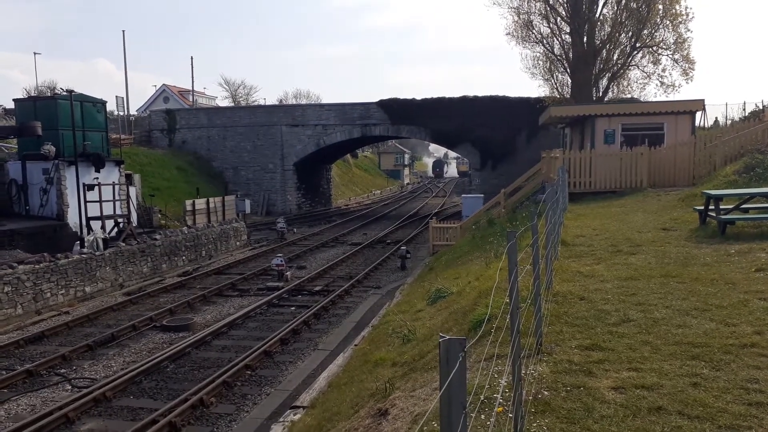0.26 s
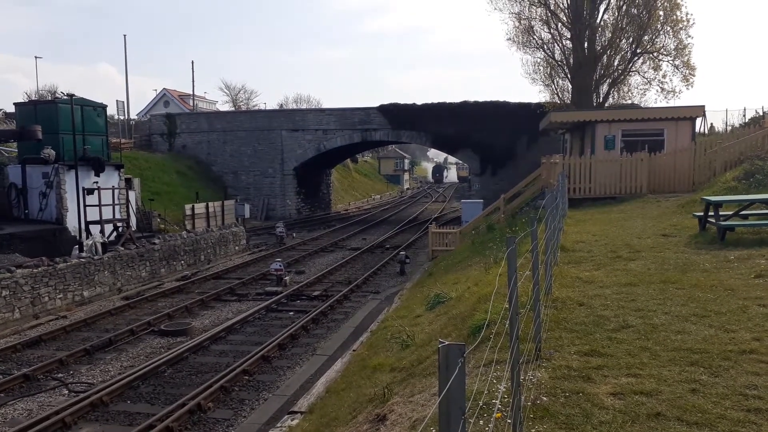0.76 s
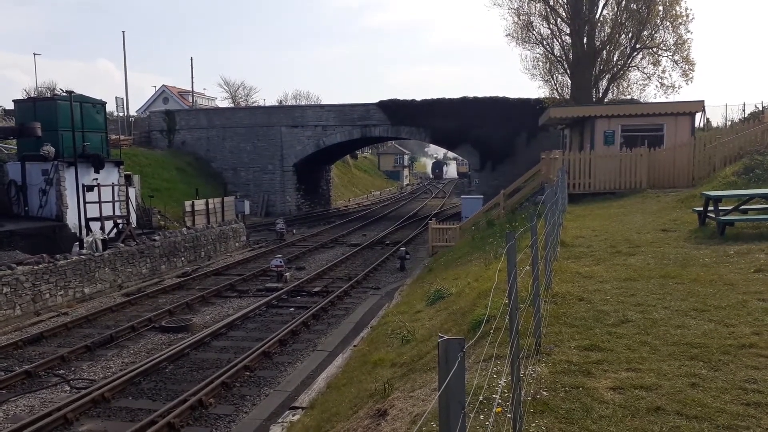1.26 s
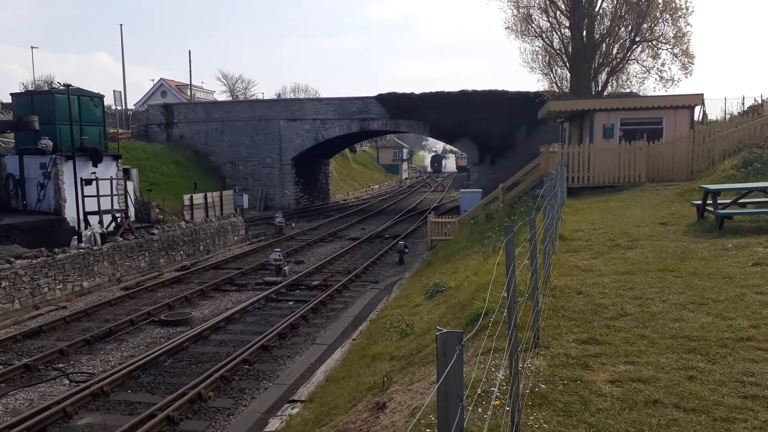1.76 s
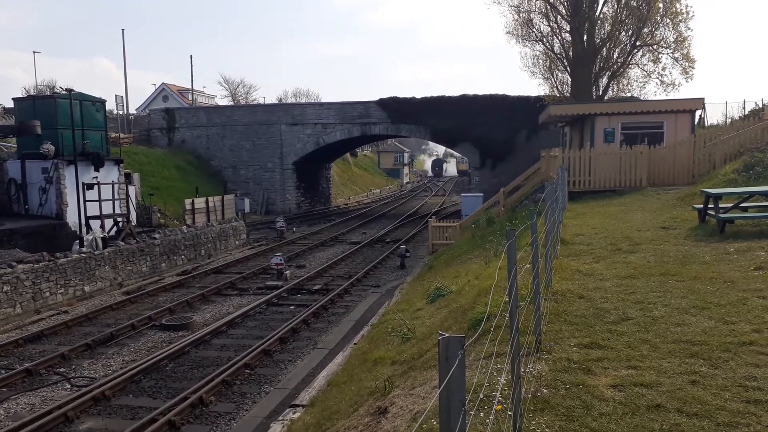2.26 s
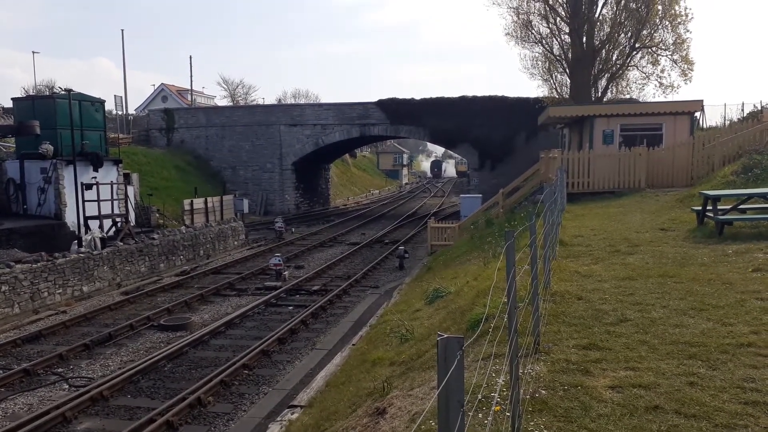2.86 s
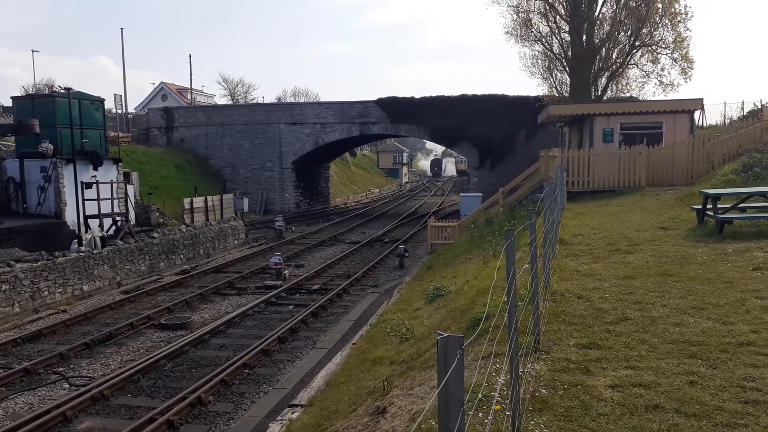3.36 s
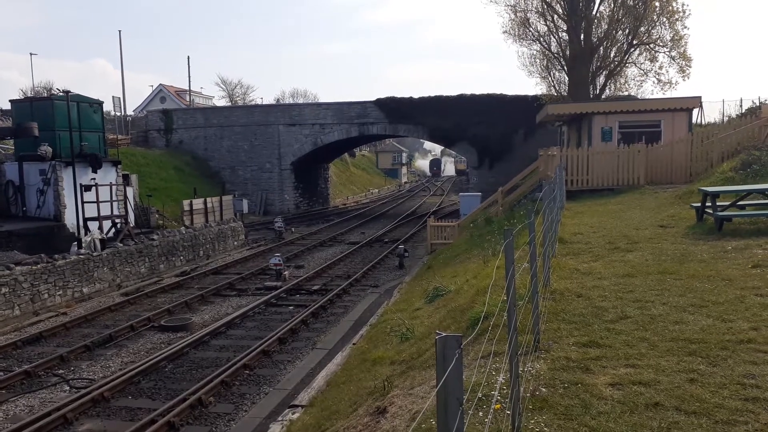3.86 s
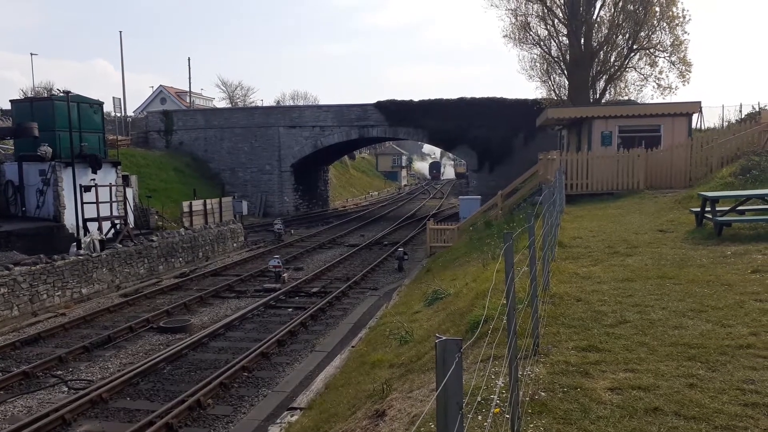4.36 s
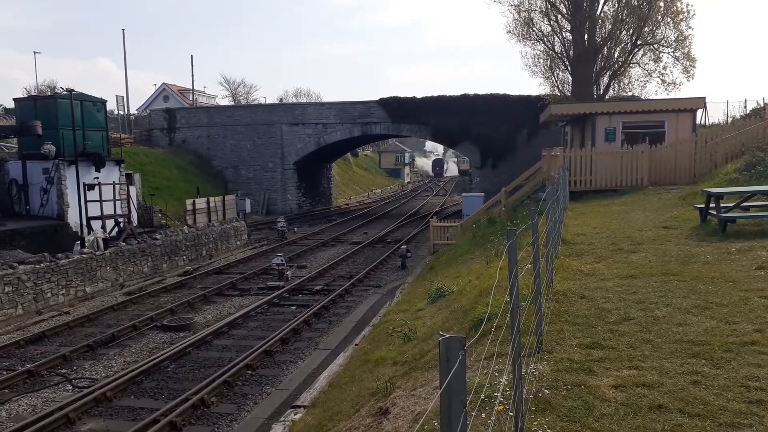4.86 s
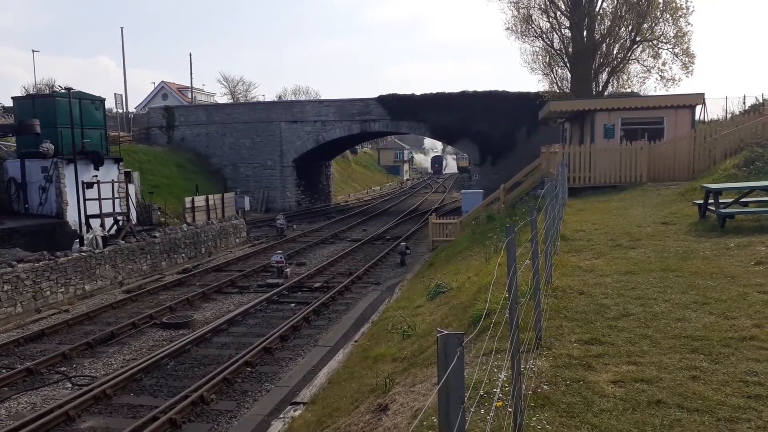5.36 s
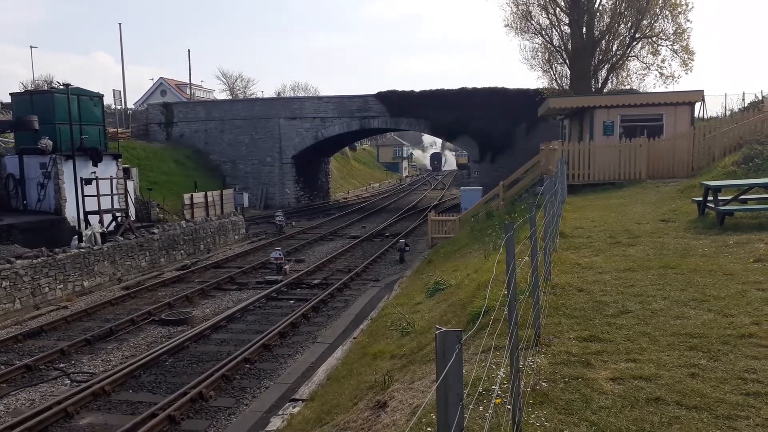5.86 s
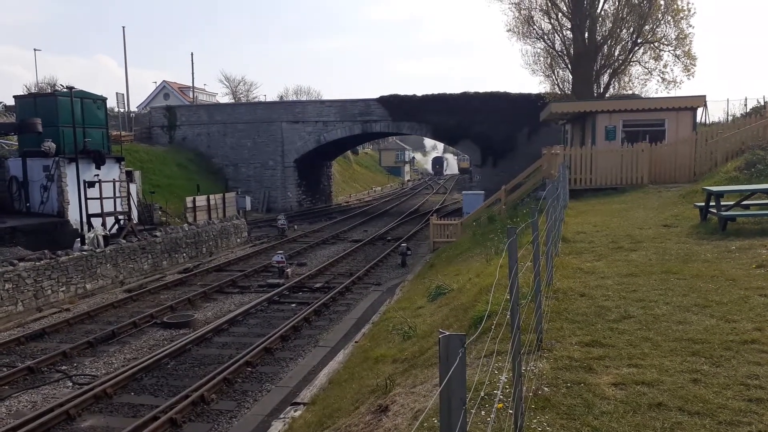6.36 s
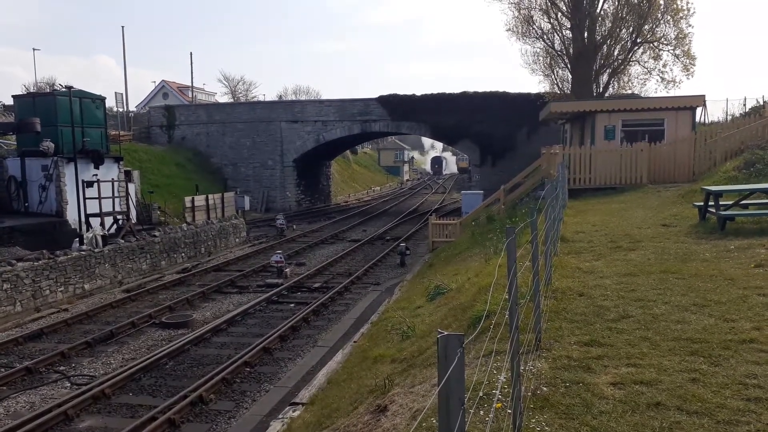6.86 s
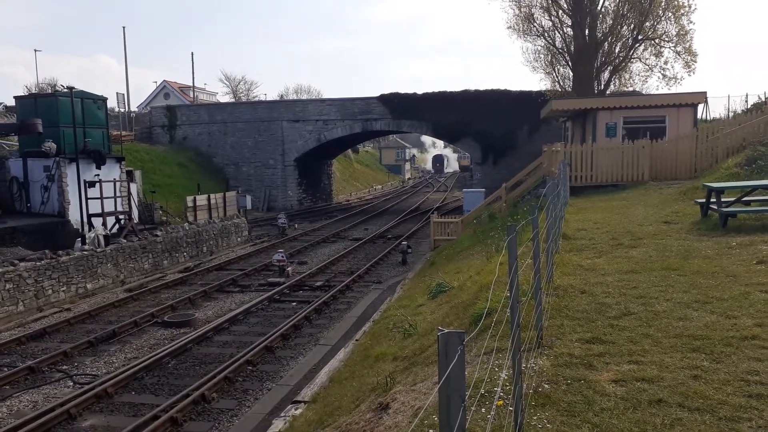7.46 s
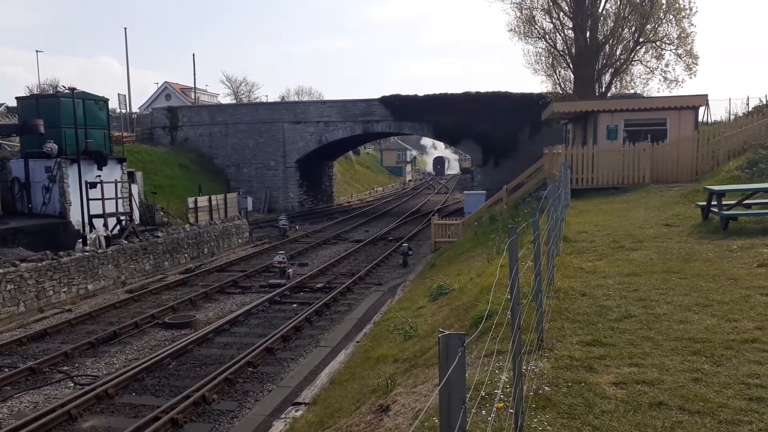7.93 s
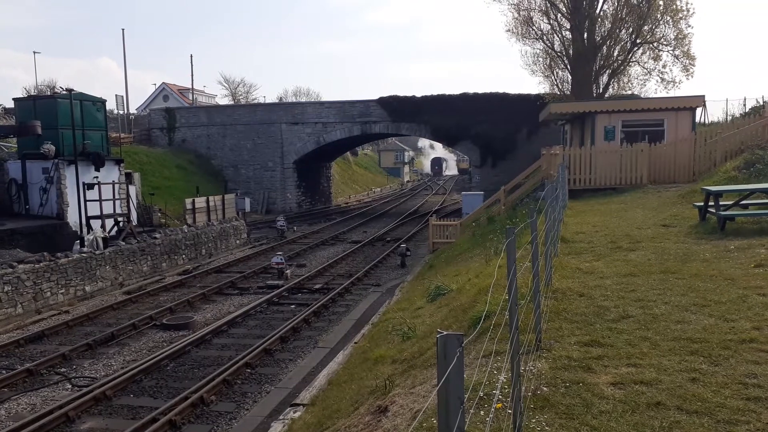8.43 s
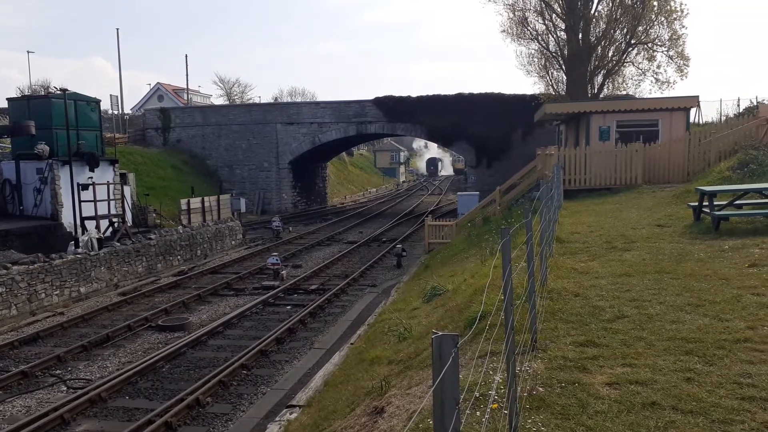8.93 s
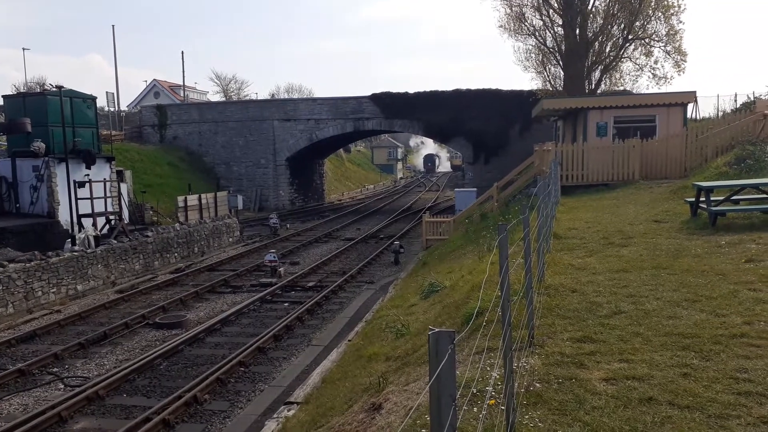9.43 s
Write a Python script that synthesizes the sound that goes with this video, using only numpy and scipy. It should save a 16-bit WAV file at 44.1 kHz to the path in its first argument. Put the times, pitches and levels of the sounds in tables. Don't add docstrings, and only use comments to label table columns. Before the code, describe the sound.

A distant steam locomotive beyond a stone arch vents steam in an open railway yard, heard in stereo from a grassy bank. At 0 s a broad, airy hiss is already blowing; it weakens from about 1.3 s to a thin leak by 1.6 s. Soft low wind buffets bump the microphone, strongest near 0.85 s and continuing to about 1.6 s, with another near 2.9 s. A faint dry rustle opens the scene and recurs near 2 s; a small dull thud falls at 2.4 s. Around 3.45 s the hiss jumps up, swelling fuller from 4.4 to 6 s, then easing until 7 s. A tiny bright click at 7.4 s precedes the strongest burst at 7.6 s, slightly coarser, which settles into a strong, fluttering hiss to the end at about 9.7 s. Faint far traffic rumbles and engine drones continue underneath.

```python
import sys
import numpy as np
from scipy import signal
from scipy.fft import rfft, irfft, next_fast_len
from scipy.io import wavfile
from scipy.ndimage import uniform_filter1d

SR = 44100
rng = np.random.default_rng(int(sys.argv[2]) if len(sys.argv) > 2 else 0)


def ratio(d):
    e = np.asarray(d, float) / 20
    return 10 ** e


def wav_record(signal):
    frames = np.transpose(np.atleast_2d(signal))
    bounded = np.clip(frames, -1, 1)
    quanta = np.round(bounded * 32767).astype(np.int16)
    wavfile.write(sys.argv[1], SR, quanta)


N = 427329
SECONDS = np.arange(N) / SR
SIZE = next_fast_len(N + 8192)
HZ = np.maximum(np.arange(SIZE // 2 + 1) * SR / SIZE, 1)

# freq_hz, density_db_per_hz
TRAFFIC_SPECTRUM = [(35, -23), (70, -12), (150, 3), (250, 4), (350, 3), (450, -0.5), (700, 3.5),
                    (1500, -44)]
# centre_s, half_length_s, rise_db
PASSES = [
    (0.0, 0.17, 5),
    (2.5, 1.6, 3.5),
    (5.7, 0.29, 2.5),
    (7.15, 0.52, 3),
    (9.45, .1, 1.5),
]
# start_s, end_s, start_hz, end_hz, level_db
ENGINES = [
    (.3, 2.1, 228, 226, -67),
    (3.6, 4.1, 300, 282, -62),
    (4.0, 4.45, 112, 112, -64),
    (4.7, 6.25, 119, 137, -61),
    (5.2, 5.8, 225, 228, -65),
    (5.2, 6.6, 333, 336, -66),
    (6.1, 7.2, 65, 72, -64),
    (6.95, 8.35, 105, 113, -63),
    (7.3, 7.7, 295, 305, -62),
    (8.75, 9.5, 114, 121, -60),
]
TRAFFIC_DB, TRAFFIC_WAVER_DB = -60.5, 1.2
HUM_HZ, HUM_WIDTH_HZ, HUM_DB = 191, 5, -65

# freq_hz, density_db_per_hz
BUFFET_SPECTRUM = [(30, -44), (48, -1), (65, 1.5), (100, -2.5), (160, -11.5), (260, -21), (500, -60)]
# peak_s, peak_db, half_length_s, left_over_right_db
GUSTS = [(0.02, -45.5, 0.067, -11), (0.158, -51, .03, -5), (0.243, -49, 0.027, -11), (0.43, -57, .04, 12.5),
         (0.51, -48, .025, 0.5), (0.855, -31.5, 0.048, 3), (0.963, -41.5, 0.082, 3), (1.16, -41, .04, 0),
         (1.237, -41, .025, -16), (1.31, -44, .03, 11), (1.39, -39.5, 0.033, -7), (1.515, -43, .035, 3),
         (1.642, -55, .04, 21), (1.774, -53, .04, 12), (1.922, -53, 0.036, 11), (2.412, -55, .04, 6),
         (2.548, -52, .07, 12), (2.858, -40, 0.077, 7), (3.05, -50, .03, 3), (3.26, -52, 0.059, -1),
         (3.78, -53, .05, 7.5), (4.456, -53, .025, 18), (4.568, -49, 0.035, 26), (4.91, -53.5, .06, 18),
         (5.757, -53, .05, 22), (5.88, -53, .03, 7), (7.07, -57, .15, 9), (8.23, -60, .1, 9)]
GUST_FALL_DB = 9.5
BREEZE_DB, BREEZE_FADE_DB_PER_S, BREEZE_LEAN_DB, BREEZE_WAVER_DB = -62, 0.4, 11, 1.4

# centre_s, length_s, level_db, lowest_hz
RUSTLES = [
    (.01, 0.073, -56, 10900),
    (1.97, .09, -63, 10500),
    (2.67, .03, -64, 12500),
    (3.95, 0.037, -65, 12000),
]
# start_s, peak_db, pitch_hz, t60_s
KNOCKS = [
    (2.41, -34.5, 151, 0.052),
    (7.414, -46, 13000, .006),
]

# time_s, pressure_db, opening (-1 narrow to 1 wide), dryness (-1 wet to 1 dry)
COCKS = [(0.0, -27, -0.069, 0.22), (0.85, -27, -0.47, -0.64), (1.3, -30, -0.013, -0.61),
         (1.6, -41, 0.28, -0.013), (3.4, -37.5, 0.021, -0.13), (3.49, -29.5, 0.042, 0.28),
         (4.45, -24, -0.41, 0.34), (5.25, -25, 0.16, 0.77), (5.52, -28, 0.94, .6),
         (5.97, -26.5, 0.45, 0.021), (6.2, -31, -0.0066, 0.098), (6.85, -32.5, 0.03, -0.0096),
         (7.51, -28, -0.062, -0.2), (7.6, -19, -0.43, -1.2), (7.8, -24, 0.37, -0.11),
         (8.4, -25, 0.93, 0.47), (9.0, -23, 0.071, -0.071), (9.69, -25.5, -0.18, .4)]
COLOUR_HZ = (850, 1800, 3700, 7000, 8800)
# at_mean_pressure_db, per_pressure_db_db, per_unit_opening_db
BODY = (-12, -0.67, 0.88)
THROAT = (-7, .01, 5)
EDGE = (-11, .01, .6)
PIPE = (-11.5, 0.25, 5.5)
# freq_hz, density_db_per_hz
JET_SPECTRUM = [(420, -42.5), (600, -21.5), (1200, -17.0), (1500, -13.0), (2200, -9.0), (3300, -8.5),
                (4200, -10.5), (5200, -14.5), (6700, -17.0), (7800, -19.5), (9000, -36.0), (11800, -37.0),
                (13500, -43.5), (15800, -65.0)]
# freq_hz, width_hz, left_db, right_db, left_lag_rad
RIPPLES = [(700, 40, 1.5, 1.5, 0), (850, 40, -3, -2.5, 0), (990, 50, 2.5, 2.0, -0.1),
           (1260, 60, -3.5, -3.5, 0.4), (1940, 50, -2.0, -1.0, -0.2), (2200, 90, -0.5, -6.0, 0.5),
           (2570, 110, 4.0, 5.0, -0.3), (2740, 140, -1.5, -7.0, 0.2), (2930, 80, -3, -1, 0),
           (3320, 160, 6.0, 3.5, -0.3), (3570, 100, 0.0, -5.0, 0.5), (3820, 140, 4.0, 4.5, 0.3),
           (4190, 100, 2.5, 1.0, 0.8), (4290, 100, -4.0, 3.0, -0.3), (4670, 110, -3.0, 3.0, 1.0),
           (4770, 110, -2.5, 0.5, -0.9), (5300, 260, 6.0, 2.5, -0.5), (5410, 90, -2.5, -4.0, 0.4),
           (5800, 180, 3.5, -1.0, -1.0), (6300, 200, -4.0, 2.5, -1.0), (6640, 150, -6.0, -3.5, 0.2),
           (7380, 90, -2.5, 1.5, -0.0), (7480, 190, 2.0, -2.5, -0.6), (8250, 260, 4.0, 2.5, -0.5)]
# freq_hz, left_over_right_db, left_lag_rad, scattered_over_direct_db
PORTS = [(480, 3.5, 0.1, -7.5), (700, 4.5, 0.2, -12.5), (1500, 4.0, 0.2, -5.0), (3200, 1.5, 1.0, -7.0),
         (4600, 2.5, 0.9, -5.0), (5700, -6.5, 1.6, -6.0), (6400, 13.5, 1.3, -6.5), (7200, 3.5, 1.5, -5.5),
         (8800, 11.5, 2.5, 0.5), (10200, 6.0, 3.2, -2.0), (11200, 0.0, 3.3, -5.0), (13500, 1.0, 3.1, -5.0),
         (14500, 3.0, 3.4, 2.5)]
MEAN_PRESSURE_DB, DRY_EDGE_DB = -30, 3.5
LEAK_DB, BLAST_DB = -37, -29
BLAST_SCATTER_DB, LEAK_SCATTER_DB = -2.5, 1.5
LEAK_AHEAD_S = 1.6e-5
WHISTLE_HZ, WHISTLE_WIDTH_HZ = 2460, 110
ECHO_START_S, ECHO_T60_S, ECHO_DB = .012, .25, -6.5

HISS_DB = -61.5
HISS_HUSH_DB_PER_DB = .12
TOP_HZ = 15720


def rms_one(x):
    return x / np.sqrt(np.mean(x ** 2) + 1e-20)


def in_time(rows):
    time_s, *columns = np.transpose(rows)
    return [np.interp(SECONDS, time_s, column) for column in columns]


def in_hz(rows):
    freq_hz, *columns = np.transpose(rows)
    return [np.interp(np.log(HZ), np.log(freq_hz), column) for column in columns]


def drift(rate_hz):
    pole = np.exp(-80 * np.pi * rate_hz / SR)
    white = rng.standard_normal(N // 40 + 2002)
    slow = signal.lfilter([1], [1, -2 * pole, pole * pole], white)[2000:]
    return np.interp(np.arange(N) / 40, np.arange(len(slow)), rms_one(slow))


def filtered(x, response):
    return irfft(rfft(x, SIZE) * response, SIZE)[..., :N]


def noise(response, channels):
    return rms_one(filtered(rng.standard_normal((channels, N)), response))


def bump(hz, width_hz):
    return np.exp(-.5 * ((HZ - hz) / width_hz) ** 2)


def traffic_db():
    level_db = TRAFFIC_DB + TRAFFIC_WAVER_DB * drift(1.1)
    for centre_s, half_s, rise_db in PASSES:
        level_db = level_db + rise_db * np.exp(-.5 * ((SECONDS - centre_s) / half_s) ** 2)
    return level_db


def engine(start_s, end_s, start_hz, end_hz, level_db):
    gone = np.clip((SECONDS - start_s) / (end_s - start_s), 0, 1)
    hz = start_hz + (end_hz - start_hz) * gone + 1.63 * drift(4.4)
    envelope = np.sqrt(np.sin(np.pi * gone) + 1e-12)
    level = ratio(level_db + 1.5 + 3.4 * drift(8.0))
    return level * envelope * np.sin(2 * np.pi * np.cumsum(hz) / SR)


def town():
    common, *own = noise(ratio(in_hz(TRAFFIC_SPECTRUM)[0]), channels=3)
    rumble = ratio(traffic_db() + 4.0) * (common + ratio(-8.0) * np.array(own))
    tones = ratio(HUM_DB + drift(.6)) * noise(bump(HUM_HZ, HUM_WIDTH_HZ), channels=1)[0]
    for row in ENGINES:
        tones = tones + engine(*row)
    return (rumble + tones) * ratio([[2.5], [-2.5]])


def gusts():
    lean = np.array([[BREEZE_LEAN_DB / 2], [-BREEZE_LEAN_DB / 2]])
    breeze_db = BREEZE_DB - BREEZE_FADE_DB_PER_S * SECONDS + BREEZE_WAVER_DB * drift(1.5) + lean
    power = ratio(breeze_db) ** 2
    for peak_s, peak_db, half_s, lean_db in GUSTS:
        gust_db = peak_db - GUST_FALL_DB * np.abs(SECONDS - peak_s) / half_s
        power = power + ratio(gust_db) ** 2 * ratio([[lean_db], [-lean_db]])
    return np.sqrt(power)


def wind():
    lumps_db = 2.0 * np.array([drift(8.7), drift(30)])
    return noise(ratio(in_hz(BUFFET_SPECTRUM)[0]), channels=2) * ratio(lumps_db) * gusts()


def rustles():
    out = 0
    for centre_s, length_s, level_db, low_hz in RUSTLES:
        band = np.clip((HZ - low_hz) / 2500 + .5, 0, 1) * (HZ < 16000)
        bright = noise(band, channels=2)
        envelope = np.exp(-.5 * ((SECONDS - centre_s) / length_s) ** 2)
        out = out + ratio(level_db) * envelope * (bright[0] + .6 * bright)
    return out * ratio([[0], [-6]])


def knocks():
    out = 0
    for start_s, peak_db, pitch_hz, t60_s in KNOCKS:
        age_s = np.maximum(SECONDS - start_s, 0)
        out = out + ratio(peak_db - 60 * age_s / t60_s) * np.sin(2 * np.pi * pitch_hz * age_s)
    return out * ratio([[1.5], [-1.5]])


def echoes():
    age_s = np.arange(SR // 4) / SR
    tail = rng.standard_normal(len(age_s)) * ratio(-60 * age_s / ECHO_T60_S) * (age_s > ECHO_START_S)
    tail = tail / np.sqrt(np.sum(tail ** 2))
    share = ratio(ECHO_DB)
    return (1 + share * rfft(tail, SIZE)) / np.sqrt(1 + share ** 2)


def jet_colours():
    level_db, opening, dryness = in_time(COCKS)
    parts_db = []
    for mean_db, per_db, wide_db in (BODY, THROAT, EDGE, PIPE):
        parts_db.append(mean_db + per_db * (level_db - MEAN_PRESSURE_DB) + wide_db * opening)
    body_db, throat_db, edge_db, pipe_db = parts_db
    return level_db, body_db, throat_db, edge_db + DRY_EDGE_DB * dryness, pipe_db


def turbulence(colours_db, whistle_db, shared_db, own_db, fast_db):
    white = rfft(rng.standard_normal((3, SIZE)))
    place = 3 * np.log2(HZ / 400)
    together = drift(3.0)
    out = 0
    for k in range(17):
        band_log_hz = np.log(400) + k * np.log(2) / 3
        weights = [np.interp(band_log_hz, np.log(COLOUR_HZ), row) for row in np.eye(len(COLOUR_HZ))]
        flutter_db = shared_db * together + own_db * drift(2.75) + fast_db * drift(40)
        band_db = np.dot(weights, colours_db) + flutter_db
        window = np.cos(np.pi / 2 * np.clip(place - k, -1, 1)) ** 2
        out = out + ratio(band_db) * irfft(white * window, SIZE)[:, :N]
    pipe = irfft(white * bump(WHISTLE_HZ, WHISTLE_WIDTH_HZ), SIZE)[:, :N]
    return out + (ratio(whistle_db + 8) - ratio(.6 * colours_db[1])) * pipe


def steam():
    level_db, body_db, throat_db, edge_db, whistle_db = jet_colours()
    edge_db = edge_db + 9.5
    colours_db = np.array([body_db + 15, throat_db + 5.5, 0 * level_db, edge_db, 1.3 * edge_db])
    jets = turbulence(colours_db, whistle_db, shared_db=0.49, own_db=0.82, fast_db=0.68)
    direct, *scattered = ratio(level_db) * jets
    blast = np.clip((level_db - LEAK_DB) / (BLAST_DB - LEAK_DB), 0, 1)

    lean_db, lag_rad, scatter_db = in_hz(PORTS)
    bells = np.array([bump(hz, width_hz) for hz, width_hz, *rest in RIPPLES])
    left_db, right_db, ripple_lag_rad = np.array(RIPPLES)[:, 2:].T @ bells
    turn = np.exp(-.5j * (lag_rad + ripple_lag_rad))
    jet = ratio(in_hz(JET_SPECTRUM)[0] + 17.5) * ratio([lean_db / 2, -lean_db / 2])
    path = jet * ratio([left_db, right_db]) * [turn, 1 / turn]
    ahead = np.exp(1j * np.pi * HZ * LEAK_AHEAD_S)

    from_blast = filtered(direct * blast, path * echoes())
    from_leak = filtered(direct * (1 - blast), path * [ahead, 1 / ahead] * echoes())
    loosened = ratio(BLAST_SCATTER_DB * blast + LEAK_SCATTER_DB * (3 - blast))
    from_yard = filtered(scattered * loosened, jet * ratio(scatter_db) * [echoes(), echoes()])
    return from_blast + from_leak + from_yard


def scene():
    return town() + wind() + rustles() + knocks() + steam()


def band_limit(x):
    return signal.sosfilt(signal.butter(12, 15920, fs=SR, output="sos"), x)


def record(dry):
    power = uniform_filter1d(np.mean(dry ** 2, axis=0), size=SR // 5)
    loud_db = 10 * np.log10(power + 1e-12)
    hiss_db = HISS_DB - HISS_HUSH_DB_PER_DB * np.maximum(loud_db - LEAK_DB, 0)
    hissy = dry + ratio(hiss_db) * rng.standard_normal(dry.shape)
    top_cut = np.clip((TOP_HZ - HZ) / 150 + .5, 0, 1)
    return band_limit(filtered(hissy, top_cut))


dry = scene()
out = record(dry)
wav_record(out)
```